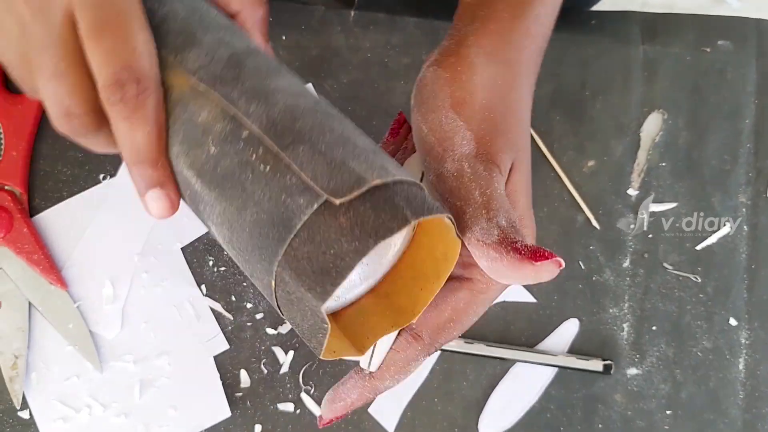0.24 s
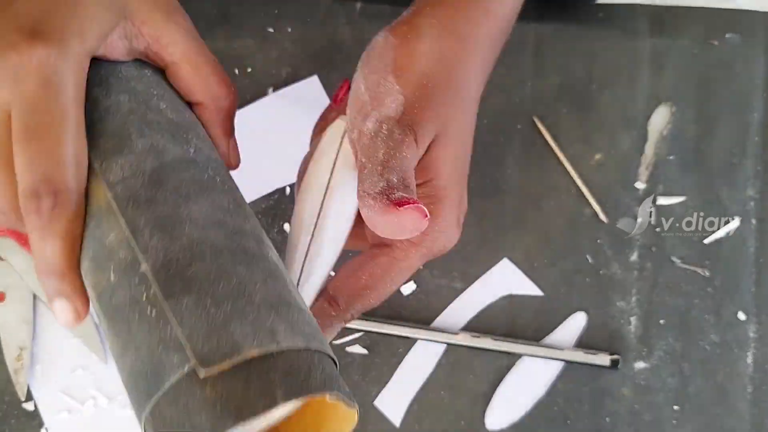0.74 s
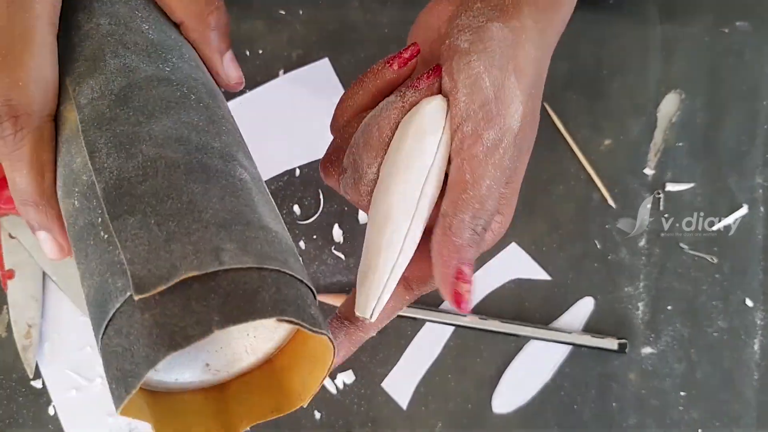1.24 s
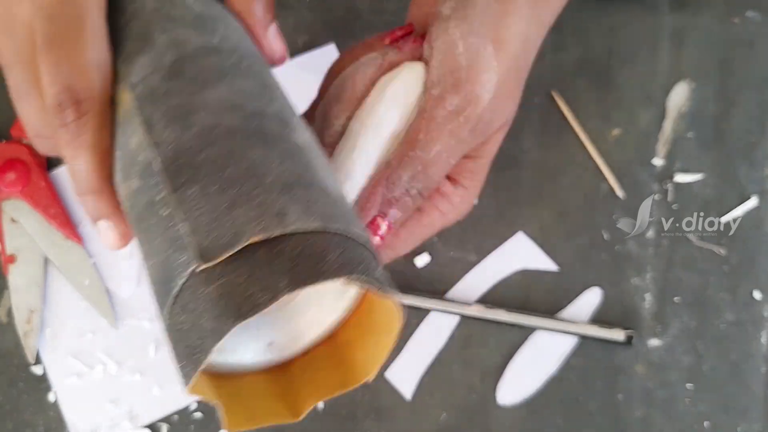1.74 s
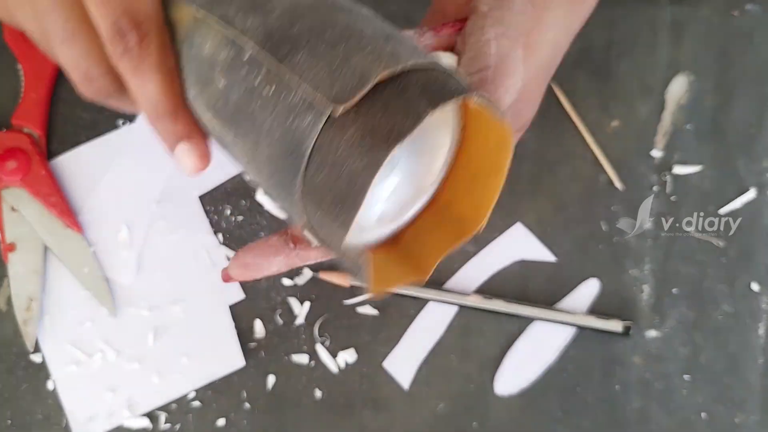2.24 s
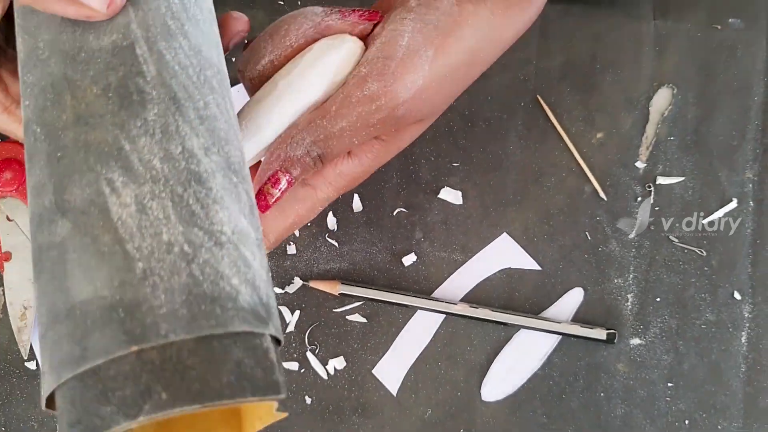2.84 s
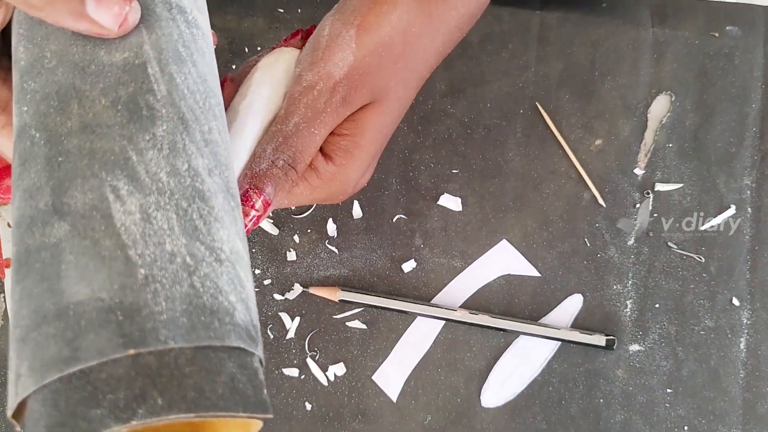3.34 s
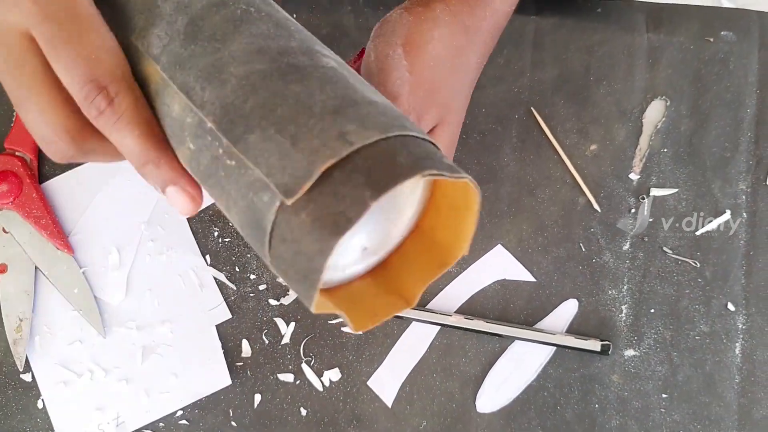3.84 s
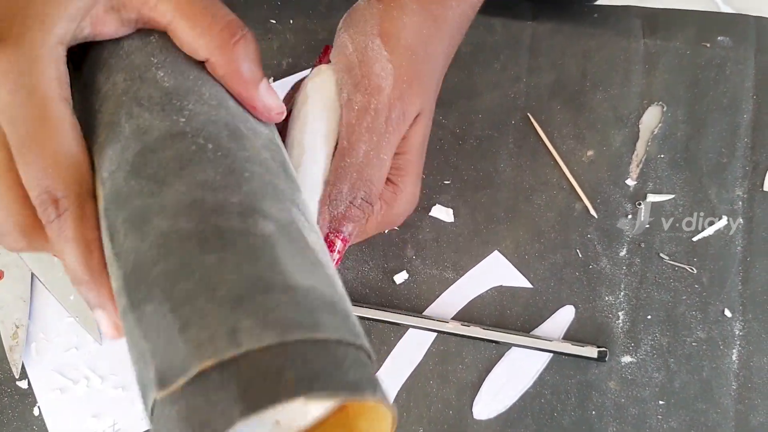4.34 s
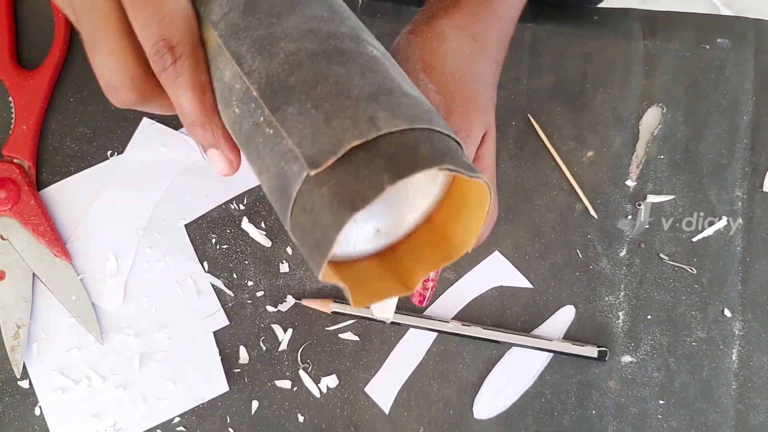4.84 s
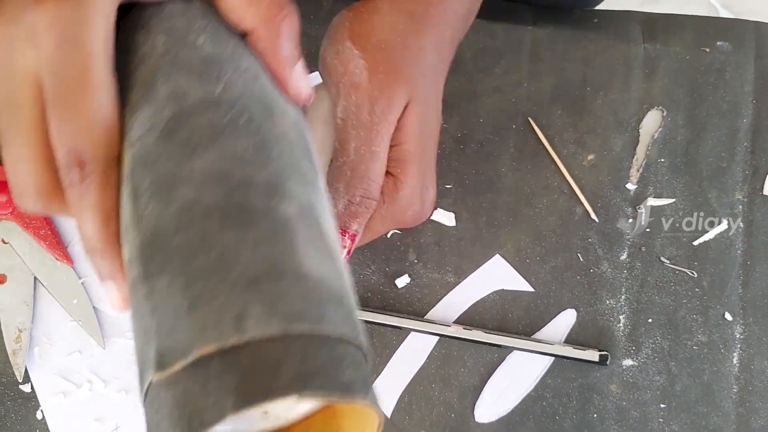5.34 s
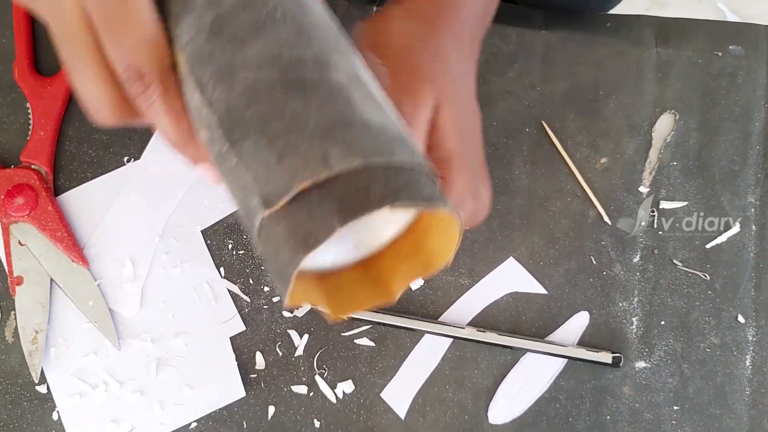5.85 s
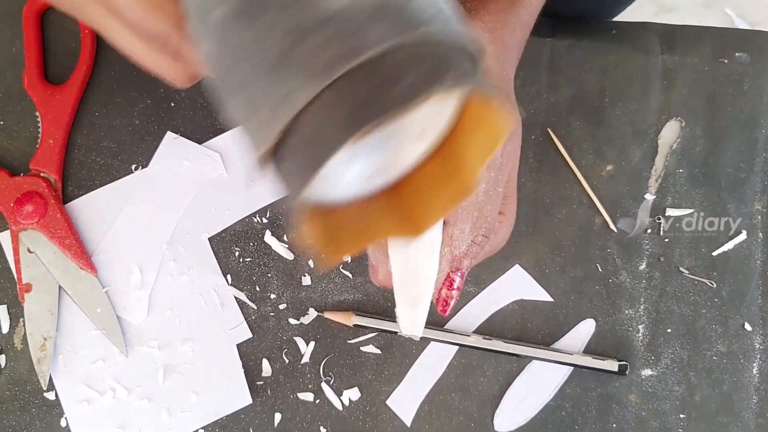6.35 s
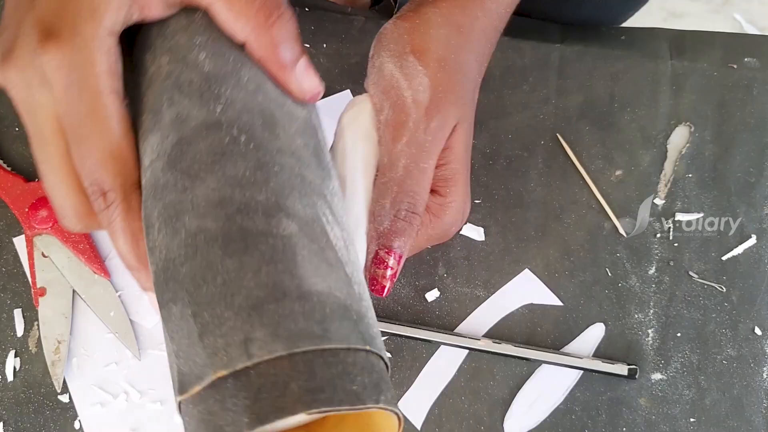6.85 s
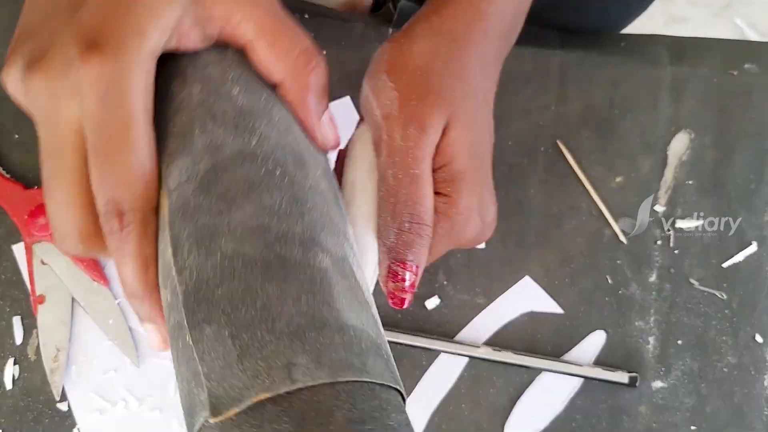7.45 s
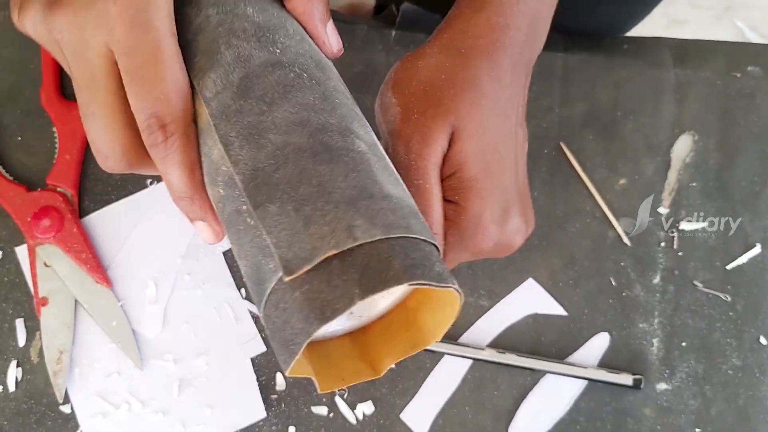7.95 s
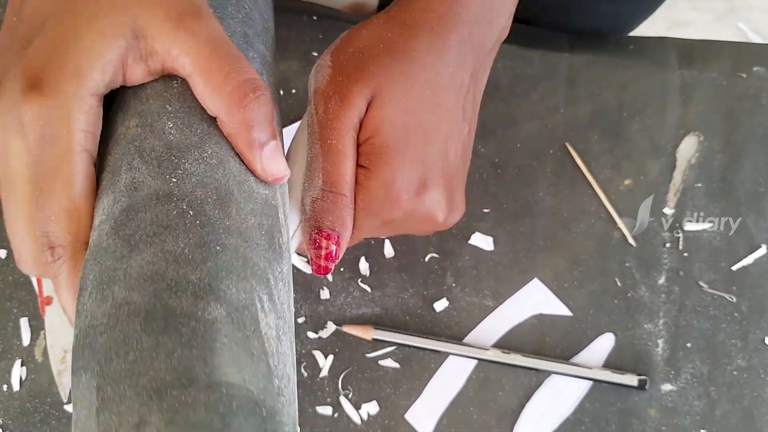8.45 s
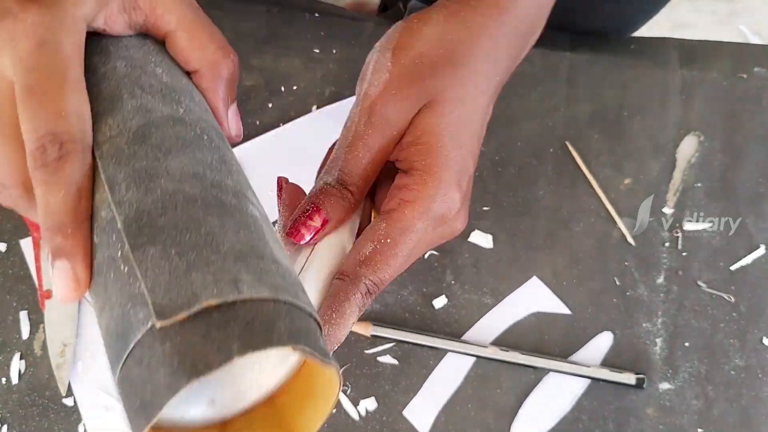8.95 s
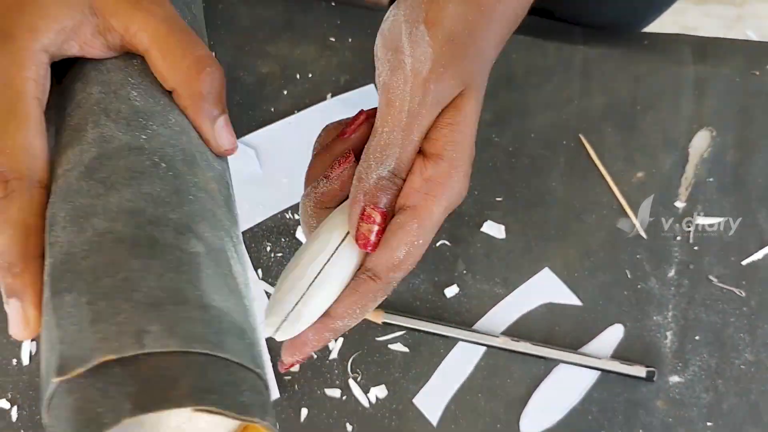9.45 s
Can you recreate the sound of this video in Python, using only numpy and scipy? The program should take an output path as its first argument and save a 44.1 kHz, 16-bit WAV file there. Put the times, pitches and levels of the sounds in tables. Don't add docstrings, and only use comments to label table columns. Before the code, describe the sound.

Very close to the microphone, sandpaper wrapped around a hollow can rubs a small wooden carving, about six strokes a second, each a dry hiss with a slight tinny ring. Bouts are split by short pauses with small knocks and faint distant birds. Soft low thumps come through the table. In the last second the work abruptly turns six times faster and higher, a buzzing scratchy flutter.

```python
import sys
import numpy as np
from scipy import signal
from scipy.fft import rfft, irfft
from scipy.io import wavfile
from scipy.ndimage import uniform_filter1d

SR = 44100
rng = np.random.default_rng(int(sys.argv[2]) if len(sys.argv) > 2 else 0)


def level_to_linear(level):
    exponent = np.asarray(level, float) / 20
    return 10 ** exponent


def persist_wave(psi):
    counts = np.round(np.clip(psi, -1, 1) * 32767).astype(np.int16)
    wavfile.write(sys.argv[1], SR, np.atleast_2d(counts).T)


N = 428199
TIME = np.arange(N) / SR
HZ = np.maximum(np.fft.rfftfreq(N, 1 / SR), 1)
CUT_S = 8.985
NORMAL, HURRY = 1, 6


def read(table, hz):
    table_hz, value = np.array(table).T
    return np.interp(np.log(hz), np.log(table_hz), value)


def colour(x, gain):
    return irfft(rfft(x) * gain, N)


def unit(x):
    return x / np.sqrt(np.mean(x ** 2))


def walk(rate):
    k = int(SR / rate)
    return unit(uniform_filter1d(uniform_filter1d(rng.standard_normal(N), k), k))


def ports(make, hurry, lag_s):
    # frequency in Hz, share 0-1
    alike = [(300, 0.97), (800, 0.89), (1500, 0.51), (3500, 0.51), (4500, 0.01), (16000, 0.01)]
    share = np.clip(read(alike, HZ / hurry), 0, 1)
    both = make()
    late = np.exp(-2j * np.pi * HZ * lag_s / hurry)
    return np.array([colour(both, share ** 0.5 * delay) + colour(make(), (1 - share) ** 0.5)
                     for delay in (1, late)])


def bounce(x, lag_s, share):
    echoed = [c + share * np.interp(TIME - np.abs(lag_s), TIME, c) for c in x]
    return np.array(echoed) / np.sqrt(1 + share ** 2)


def room(x, t60, wet_db, dull_hz):
    t = TIME[:int(t60 * SR)]
    tail = rng.standard_normal((2, len(t))) * 1000 ** (-t / t60) * (t > t60 / 50)
    tail = tail / np.sqrt(np.sum(tail[0] ** 2))
    tail = signal.lfilter(*signal.butter(1, dull_hz, fs=SR), tail)
    return x + level_to_linear(wet_db) * signal.fftconvolve(x, tail, axes=1)[:, :N]


def air(hurry):
    # frequency in Hz, density in dB per Hz
    air_spectrum = [(15, -54.5), (25, -6), (64, -6.5), (87, -12.5), (439, -22.5), (531, -20), (591, -20.5),
                    (677, -20), (4740, -31.5), (16000, -46.5)]
    shape = level_to_linear(read(air_spectrum, HZ / hurry))
    hush = unit(ports(lambda: colour(rng.standard_normal(N), shape), hurry, 0))
    return hush * level_to_linear(-64.5 + 0.41 * walk(7.2))


def birds(calls, wobble):
    out = np.zeros((2, N))
    for start, end, hz0, hz1, db in calls:
        n = int((end - start) * SR)
        hoarse_hz = wobble * hz0
        k = int(SR / hoarse_hz / 2)
        a, b = (uniform_filter1d(rng.standard_normal((3, n)), k) * k ** 0.5 for _ in range(2))
        phase = 2 * np.pi * np.cumsum(np.linspace(hz0, hz1, n)) / SR
        tone = (a + 40 / (hoarse_hz + 20)) * np.cos(phase) + b * np.sin(phase)
        tone = tone * np.sin(np.pi * np.arange(n) / n) ** 0.35
        i = int(start * SR)
        out[:, i:i + n] += level_to_linear(db) * (tone[0] + 0.5 * tone[1:])
    return out


def far_birds():
    # start in seconds, end in seconds, start in Hz, end in Hz, level in dB
    clear_calls = [(2.851, 3.0, 4500, 4360, -73), (3.0, 3.3, 4450, 4700, -82),
                   (3.026, 3.15, 6640, 6800, -79), (2.898, 2.992, 980, 950, -78),
                   (3.525, 3.585, 980, 955, -60), (3.676, 3.78, 1330, 1210, -65),
                   (3.687, 3.76, 1075, 1100, -56.5), (3.745, 3.86, 1130, 1173, -52.5),
                   (7.118, 7.45, 1150, 1090, -61.5), (6.69, 6.8, 900, 903, -71.5),
                   (7.2, 7.45, 1515, 1510, -65)]
    # start in seconds, end in seconds, start in Hz, end in Hz, level in dB
    hoarse_calls = [(3.447, 3.597, 2000, 1900, -72), (6.3, 6.67, 1780, 1660, -57.5),
                    (6.55, 6.9, 1750, 1700, -68), (5.6, 5.8, 1750, 1800, -45),
                    (6.393, 6.68, 1000, 1100, -73), (7.12, 7.52, 1560, 1665, -63),
                    (5.85, 6.3, 1600, 1600, -52), (7.5, 7.86, 1650, 1600, -49),
                    (8.986, 9.014, 7000, 6400, -58), (9.492, 9.545, 7250, 6850, -78)]
    return birds(clear_calls, 0.031) + birds(hoarse_calls, 0.13)


def table_ring(t, upper_db):
    # frequency in Hz, level in dB, 60 dB decay in seconds
    table_modes = [(75.15, 2.5, 0.48), (83.4, 3.5, 0.17), (98.7, -2, 0.28), (106, -17.5, .15),
                   (160.8, -10.5, 0.42), (173.2, -2.5, 0.4), (175, -29.5, 0.21), (223.7, -2, 0.24),
                   (235.7, -4.5, 0.19), (257.8, -5.5, 0.34), (290, -17, 0.61), (365.7, -12.5, 0.35),
                   (419, -12.5, 0.36), (450.2, -15, 0.39), (501, -7, 0.16), (561, -17, 0.27)]
    tilt_db = 0.57 * min(upper_db, 0) + 4.0
    ring = 0
    for (hz, db, t60), (louder, sharper) in zip(table_modes, rng.standard_normal((len(table_modes), 2))):
        mode = np.sin(2 * np.pi * hz * (1 + 0.015 * sharper) * t) * 1000 ** (-t / t60)
        soft_start = 1 - np.exp(-t * hz / 0.53)
        ring = ring + level_to_linear(db + np.log2(hz / 73) * tilt_db + 3.0 * louder) * mode * soft_start
    return ring


def bumps(events, hurry, gain_db):
    out = np.zeros((2, N + SR))
    t = np.arange(SR // hurry) * hurry / SR
    rebound = int(0.01276 * SR / hurry)
    rattle_band = signal.butter(2, [200 * hurry, 650 * hurry], "band", fs=SR)
    for s, db, upper_db in events:
        ring = table_ring(t, upper_db)
        ring[rebound:] += 0.68 * ring[:-rebound].copy()
        noise = rng.standard_normal(len(t)) + 2.27 * rng.standard_normal((2, len(t)))
        rattle = signal.lfilter(*rattle_band, noise) / hurry ** 0.5 * 1000 ** (-t / 0.2)
        ring = ring + level_to_linear(1.2 * min(upper_db, -7) + 12) * rattle
        i = max(int((s - 0.00314 / hurry) * SR), 0)
        out[:, i:i + len(t)] += level_to_linear(db + gain_db) * ring * (1 - np.exp(-t / 0.0042))
    no_deep_bass = signal.butter(4, 58 * hurry, "high", fs=SR, output="sos")
    return signal.sosfilt(no_deep_bass, out[:, :N])


def taps():
    # start in seconds, peak in dB, centre in Hz, 60 dB decay in seconds
    knocks = [(1.79, -33.5, 1020, 0.015), (2.735, -52.5, 2500, 0.039), (2.83, -60, 3500, 0.018),
              (3.029, -54.5, 1600, 0.036), (3.569, -62, 4000, .04), (3.719, -61, 5000, .03),
              (3.792, -34, 700, 0.037), (3.805, -40.5, 750, 0.063), (6.8104, -27, 1300, 0.019),
              (6.8138, -23, 1330, 0.011), (6.812, -34.5, 420, 0.045), (6.888, -30, 3500, .02)]
    out = np.zeros((2, N))
    t = TIME[:SR // 10]
    for s, db, hz, t60 in knocks:
        noise = rng.standard_normal(len(t)) + 0.5 * rng.standard_normal((2, len(t)))
        noise = noise * 1000 ** (-t / t60)
        knock = signal.lfilter(*signal.butter(2, [hz / 2, hz * 2], "band", fs=SR), noise)
        knock = knock * (4000 / hz) ** 0.5 + 0.13 * noise
        i = int(s * SR)
        out[:, i:i + len(t)] += level_to_linear(db) * knock
    return out


def stops(starts, lift_s, turn_s):
    return np.append(starts[1:] - turn_s, lift_s)


def slow_strokes():
    # start in seconds, speed-up in seconds, level in dB, can ring in dB,
    # brightness in dB
    first_strokes = [
        [(0.024, 0.05, -33.5, 1, 0), (0.181, 0.083, -30.5, -3.5, 3.5), (0.329, 0.056, -30, -2.6, 2.2),
         (0.484, 0.084, -34, -0.5, 6.5), (0.650, 0.057, -30, -5, -3.2), (0.801, 0.056, -29, -5.3, 4.5),
         (0.954, 0.083, -25.5, -10, -4), (1.113, 0.033, -23.5, -11, -4.5)],
        [(1.848, 0.062, -34, -2.5, -4.5), (2.006, .031, -30.5, 3, -2), (2.140, 0.047, -29.5, 2.2, 2.5),
         (2.273, 0.052, -27.5, -3.5, -6.5), (2.417, 0.061, -30, 0.3, -6)],
    ]
    long_strokes = [
        [(3.882, 0.096, -29, -5, -3.8), (4.072, 0.077, -27, -3.5, 0.5), (4.240, 0.052, -28.5, -1.6, -.7),
         (4.405, 0.057, -25.5, -2.5, 5.5), (4.560, 0.07, -27, 1, 2.2), (4.735, 0.05, -23, -5, 3.8),
         (4.895, 0.058, -24.5, -1.5, 4), (5.064, 0.088, -21, -8.5, 7), (5.232, 0.078, -26, -0.5, 4),
         (5.417, 0.074, -27, 0, 6.5), (5.589, 0.066, -25, 0.7, 0.5), (5.768, 0.06, -22.5, -5, -3),
         (5.929, 0.058, -26.5, -1.2, 0.5), (6.114, 0.095, -23, -7.5, 4), (6.279, 0.072, -24, -2.5, 1.5)],
    ]
    late_strokes = [
        [(6.886, 0.092, -30.5, -1, -2), (7.077, 0.053, -29.5, -4, -4)],
        [(7.513, 0.087, -32, 2.6, -0.8), (7.686, 0.064, -33.5, 3.5, -2.7), (7.852, 0.056, -25.5, -4, 0),
         (8.012, 0.064, -31, 1.5, -0.5), (8.169, 0.033, -27, -4, 9.5), (8.334, 0.041, -30.5, -0.5, 0.5),
         (8.493, 0.065, -26, -5, 4), (8.662, 0.1, -27, -0.2, 3.1), (8.852, 0.058, -26.5, -3, 3.5)],
    ]
    # lift-off in seconds, low band in dB, treble of the first stroke in dB,
    # treble of the last in dB
    bouts = [
        (1.194, -5, -6, 0.5),
        (2.518, -3, 0.5, 5.3),
        (6.426, -5, 0, 1.17),
        (7.183, -2, 4.8, 0.54),
        (8.975, -1.5, 3, 2.3),
    ]
    # time in seconds, level in dB, slow-down in seconds
    landings = [
        (1.793, -58, .092),
        (6.812, -44, 0.26),
    ]
    # dB in each of the five bands, low to high
    landing_tone_db = (9, -2, -23, -6, -11)
    ring_share = (0.26, 0.88, 1.19, 0.31, 0.24)
    bright_share = (-0.18, -0.79, 0.82, 0.14, 0.27)
    rows, tone_db = [], []
    for bout, shared in zip(first_strokes + long_strokes + late_strokes, bouts):
        lift_s, low_db, first_db, last_db = shared
        start, up, db, ring_db, bright_db = np.array(bout).T
        down = np.maximum(stops(start, lift_s, 0.059) - start - up, 0.02)
        rows += zip(start + up, db, up, down)
        treble_db = np.linspace(first_db, last_db, len(db))
        tone = np.outer(ring_db, ring_share) + np.outer(bright_db, bright_share)
        tone = tone + np.outer(treble_db, [0, 0, 0.065, 0.57, 0.84])
        tone[:, 0] += low_db - 0.14 * (db + 32)
        tone_db += list(tone)
    rows = np.array(rows + [(s, db, 0.0049, down) for s, db, down in landings])
    bite = np.maximum(1.32 + 51 * rows[:, 2], 2)
    return rows, bite, np.array(tone_db + [landing_tone_db] * len(landings))


def quick_strokes():
    # start in seconds, level in dB
    hurried_strokes = [
        [(9.012, -36), (9.039, -38), (9.064, -37.5), (9.089, -35.5), (9.116, -34.5), (9.142, -36), (9.167, -34),
         (9.196, -32.5), (9.224, -34.5), (9.248, -34.5), (9.277, -36.5), (9.302, -34), (9.329, -32),
         (9.355, -36), (9.383, -33), (9.408, -34), (9.435, -34.5), (9.460, -37), (9.487, -35)],
        [(9.578, -39), (9.607, -35.5), (9.634, -34.5), (9.660, -35), (9.686, -37)],
    ]
    hurried_lift_s = (9.503, 9.706)
    rise = 0.31
    rows = []
    for bout, lift_s in zip(hurried_strokes, hurried_lift_s):
        start, db = np.array(bout).T
        length = stops(start, lift_s, 0.0105) - start
        rows += zip(start + rise * length, db, rise * length, (1 - rise) * length)
    return rows


def speed_db(strokes, bite, fall):
    t = TIME[::32]
    curves = []
    for (s, db, up, down), rise in zip(strokes, bite):
        away = np.abs(t - s) / np.where(t < s, up, down)
        drop_db = 10 * away ** np.where(t < s, rise, fall)
        stuck_db = 895 * np.maximum(s - up - t, 0)
        curves.append(db - drop_db - stuck_db)
    nearest = np.repeat(np.argmax(curves, axis=0), 32)[:N]
    loudness = np.interp(TIME, t, np.max(curves, axis=0))
    slack = loudness - np.array(strokes)[nearest, 1]
    return np.maximum(loudness, -120), slack, nearest


def can_body(hz):
    # frequency in Hz, density in dB per Hz
    grit_spectrum = [(120, -59), (200, -24.5), (311, -40.5), (353, -19), (659, -7), (851, -1), (1180, -4),
                     (1300, -2.5), (1500, -4.5), (2210, -0.5), (3020, -6.5), (4200, -5), (6170, -11.5),
                     (11300, -13.5), (16000, -19.5)]
    # frequency in Hz, width in Hz, level in dB
    can_modes = [(876, 84, -5), (2356, 28, 5), (3620, 730, 9), (5530, 300, 6.5), (6660, 120, 2),
                 (7900, 91, 7), (9500, 370, 5), (11400, 960, 6.5)]
    rings = sum(level_to_linear(db) / (1 + ((hz - f) / wide * 2) ** 2) for f, wide, db in can_modes)
    return level_to_linear(read(grit_spectrum, hz)) * (1 + 0.44 * rings)


def grit_clicks(hurry):
    patch = level_to_linear(0.27 * walk(60 * hurry) + 1.2 * walk(350))

    def grains():
        return rng.standard_normal(N) * level_to_linear(0.76 * rng.exponential(size=N)) * patch

    grit = ports(grains, hurry, 0.000096)
    grit = bounce(grit, (0.0006 + 0.00015 * walk(5 * hurry)) / hurry, 0.2)
    return bounce(grit, (0.0032 + 0.0004 * walk(6 * hurry)) / hurry, 0.33)


def sanding(strokes, hurry, bite, tone_db, pan_db):
    loudness, slack, nearest = speed_db(strokes, bite, fall=2.02)
    hz = HZ / hurry
    body = can_body(hz)
    grit = grit_clicks(hurry)
    grit = grit / np.sqrt(np.mean(colour(grit[0], body) ** 2))
    out = 0
    band_hz = (1, 1400, 2800, 4800, 8000, 30000)
    for k, follow in enumerate((-0.58, -0.27, 0.65, 0.15, 0.72)):
        band = body / np.sqrt((1 + (band_hz[k] / hz) ** 8) * (1 + (hz / band_hz[k + 1]) ** 8))
        db = follow * np.maximum(slack, -40) + tone_db[nearest, k] + 2.26 * walk(20 * hurry)
        out = out + level_to_linear(db) * np.array([colour(g, band) for g in grit])
    return out * level_to_linear(loudness + np.array([[0.5], [-0.5]]) * pan_db[nearest])


def normal_work():
    # time in seconds, left minus right in dB
    pan = [(0, -5.8), (1.0, 1.7), (1.9, -.7), (2.5, -0.5), (3.9, 1.1), (6.3, -0.9), (7.0, 0.7), (8.9, .2)]
    # time in seconds, peak in dB, upper modes in dB
    slow_bumps = [(0.0, -32, 0), (0.077, -29, -13), (0.245, -19.5, -11.5), (0.572, -17, -7),
                  (0.808, -31, -4.5), (0.888, -16, -7), (1.105, -28, -2), (1.185, -15, -7),
                  (1.43, -32.5, -19.5), (2.196, -26, -15), (2.504, -19.5, -15.5), (2.795, -25.5, -19),
                  (4.521, -19, -9.5), (4.838, -19, -10.5), (5.099, -29, -11), (5.17, -20, -4),
                  (5.428, -32, -5), (5.516, -16, -12), (5.807, -59, 0.5), (5.842, -17.5, -6.5),
                  (6.186, -25.5, -18.5), (6.526, -30, -20.5), (7.35, -25.5, -17.5), (7.951, -29, -21),
                  (8.28, -25.5, -15), (8.566, -39.5, -41), (8.881, -26, -23.5)]
    rows, bite, tone_db = slow_strokes()
    pan_db = np.interp(rows[:, 0], *np.array(pan).T)
    work = sanding(rows, NORMAL, bite, tone_db, pan_db) + taps()
    return room(work, 0.35, -14.0, 10000) + bumps(slow_bumps, NORMAL, -9.5) + air(NORMAL)


def hurried_work():
    # time in seconds, peak in dB, upper modes in dB
    quick_bumps = [(9.024, -29, -22), (9.086, -20.5, -17), (9.141, -14, -11), (9.193, -15, -9.5),
                   (9.224, -26.5, -3), (9.241, -15.5, -12), (9.276, -24.5, 7), (9.294, -17.5, -11.5),
                   (9.329, -30, -4.5), (9.347, -18, -11.5), (9.398, -18, -13), (9.452, -17, -16.5),
                   (9.504, -19.5, -14), (9.537, -25.5, 6), (9.566, -29, -14), (9.625, -20, -16.5),
                   (9.66, -28, 4), (9.678, -19.5, -11), (9.705, -26, -3)]
    rows = quick_strokes()
    flat = np.zeros((len(rows), 5))
    work = sanding(rows, HURRY, flat[:, 0] + 4, flat, flat[:, 0])
    work = room(work, 0.18, -31.5, 6300) + bumps(quick_bumps, HURRY, -12.5)
    raised_air = signal.lfilter(*signal.butter(2, 8000, fs=SR), air(HURRY))
    return work + level_to_linear(4.0) * raised_air + level_to_linear(-6) * air(NORMAL)


def scene():
    fade_out = np.clip((CUT_S - TIME) / 0.0033, 0, 1)
    fade_in = np.clip((TIME - CUT_S) / 0.004, 0, 1)
    return normal_work() * fade_out + hurried_work() * fade_in + far_birds()


def top_cut(x):
    return signal.sosfilt(signal.butter(12, 16470, fs=SR, output="sos"), x)


def record(dry):
    lift = level_to_linear(1.3 / (1 + (11500 / HZ) ** 8))
    mix = np.array([colour(dry[0], 1 / lift), colour(dry[1], lift)])
    mix = signal.sosfilt(signal.ellip(10, 0.2, 70, 15900, fs=SR, output="sos"), mix)
    return top_cut(mix)


dry = scene()
out = record(dry)
persist_wave(out)
```